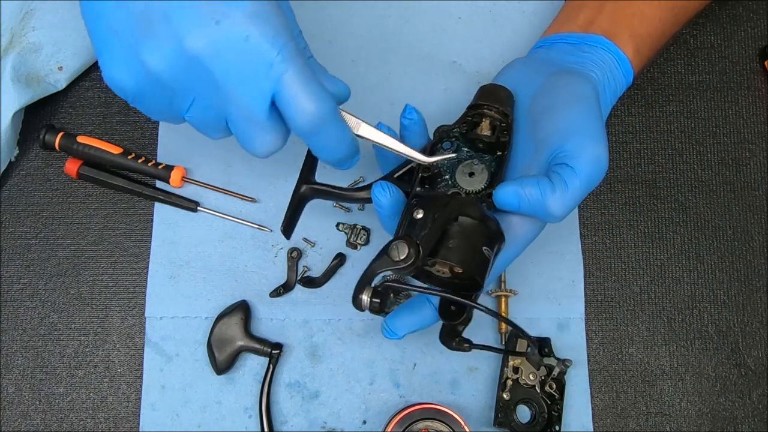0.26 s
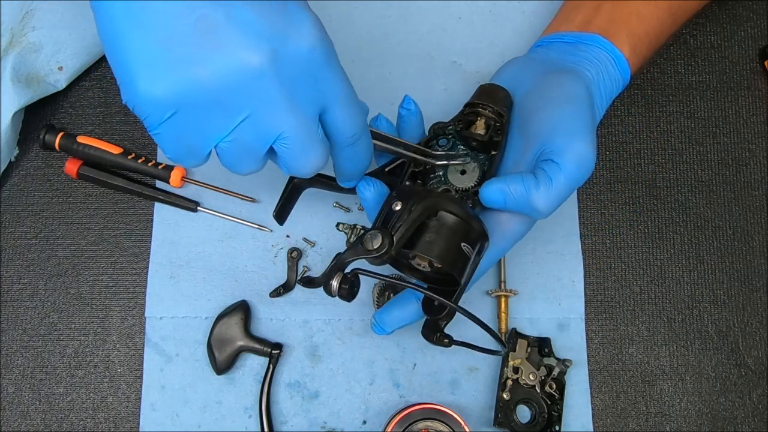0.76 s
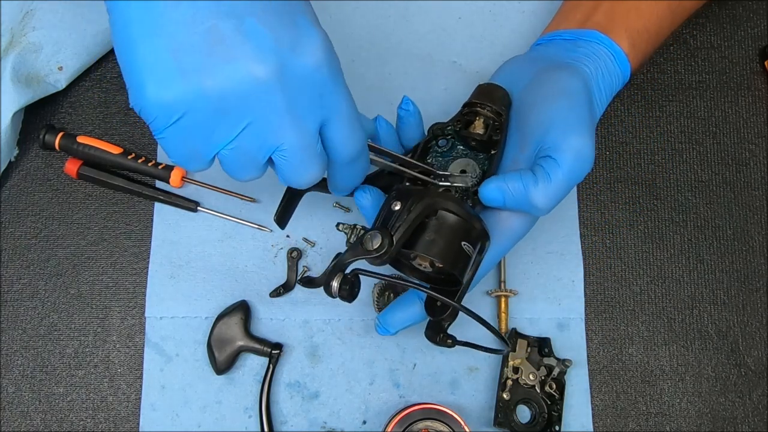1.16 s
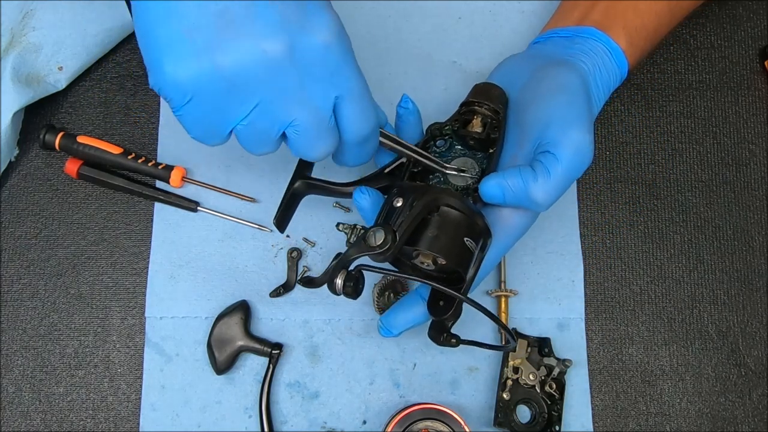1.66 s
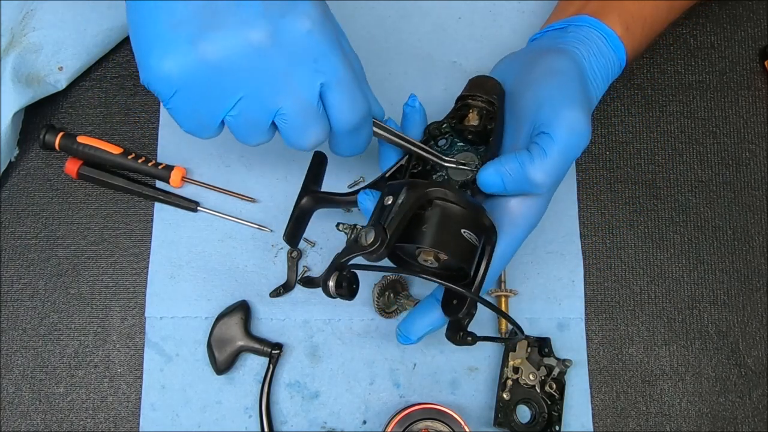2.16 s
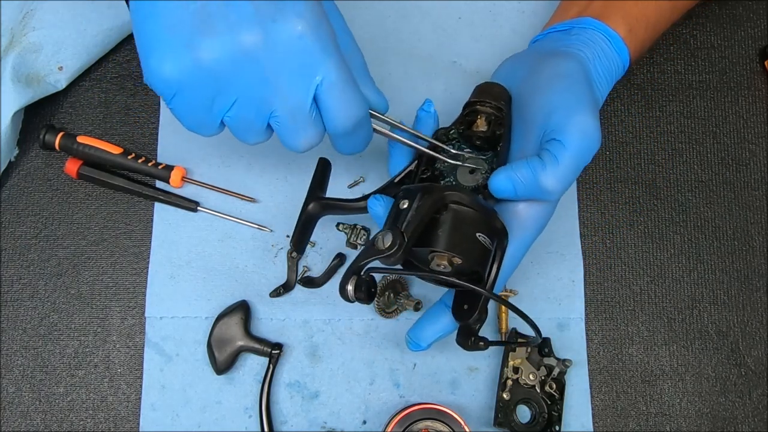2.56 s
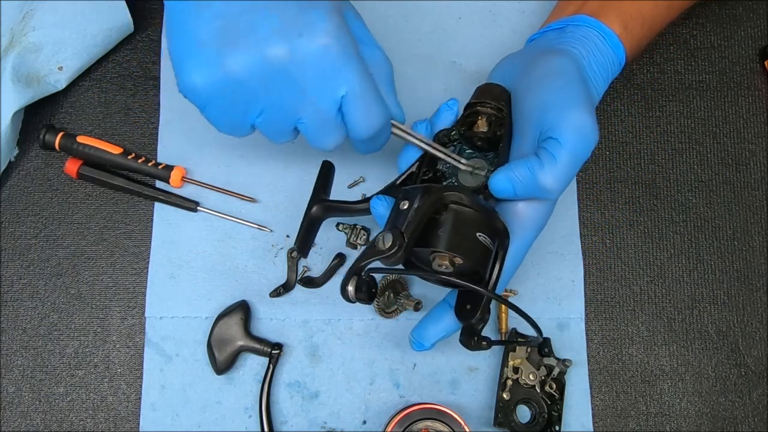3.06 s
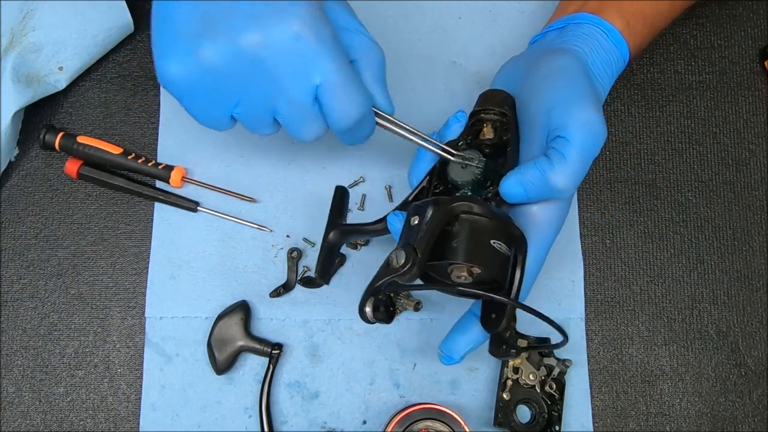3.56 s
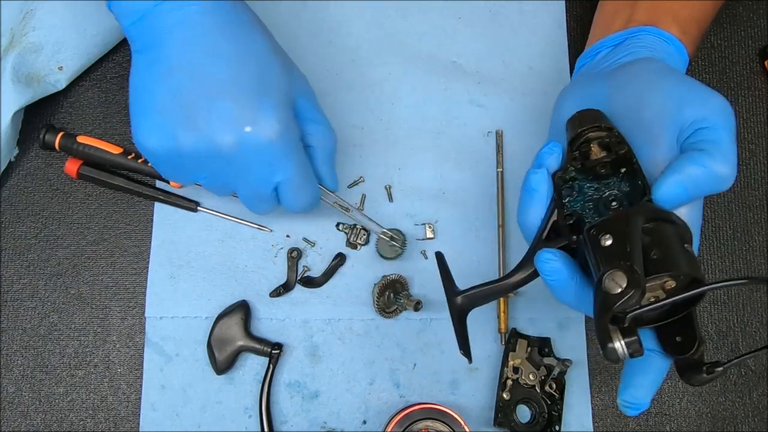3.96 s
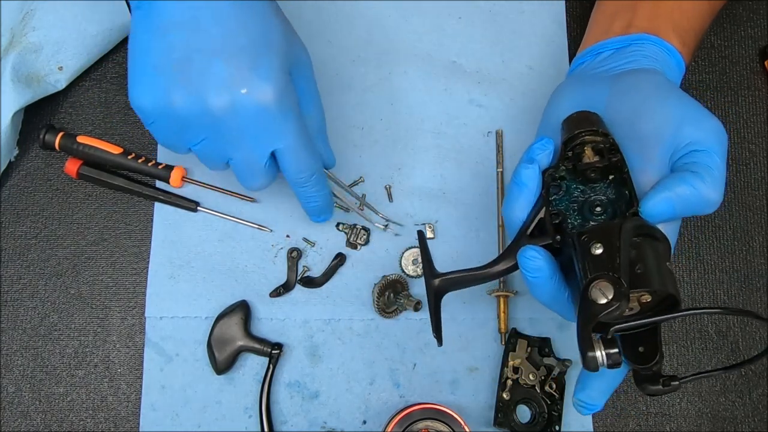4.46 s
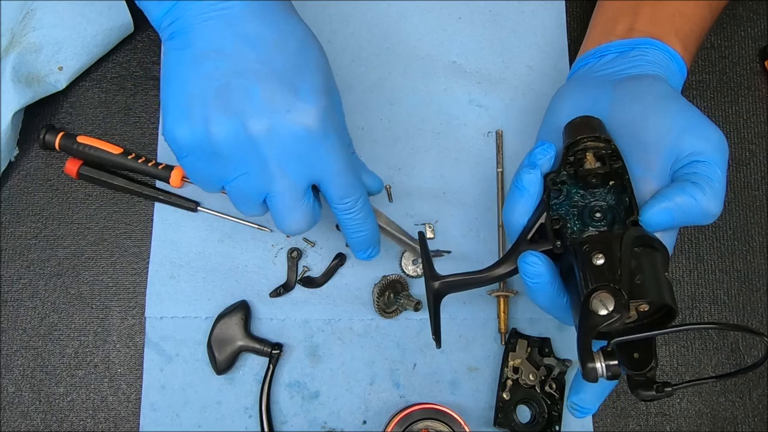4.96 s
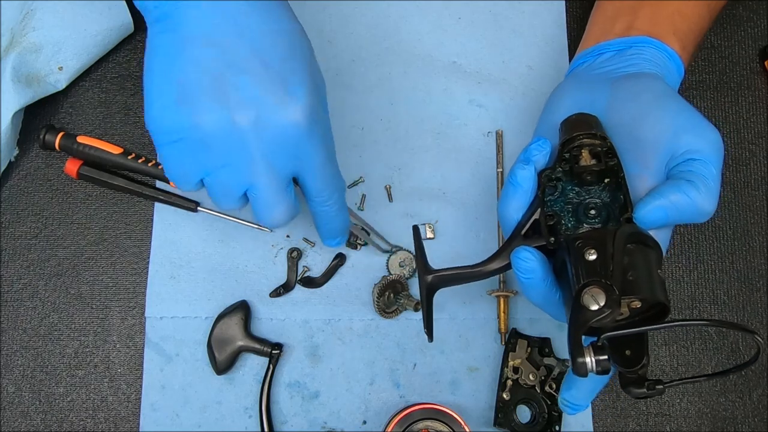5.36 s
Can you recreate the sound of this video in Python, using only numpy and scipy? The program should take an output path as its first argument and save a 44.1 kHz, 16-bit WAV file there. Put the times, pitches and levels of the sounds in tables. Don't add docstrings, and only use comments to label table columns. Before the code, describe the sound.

A low, unsteady ventilation rumble and a very faint transformer hum run throughout in a small quiet workshop. Barely audible glove brushes occur in the first half second. Steel tweezers tick on a fishing reel housing at about 0.7 s and a little more firmly at 0.9 s, with a sharp tiny crack near 1.85 s. At 2.3 s a short slide ends in the loudest bright metal click, with a rapid patter of small bounces. Dull and tinkling touches follow around 3.0 s, then a crisp gear tick at 3.43 s with a couple of bounces. At 4.2 s the gear and hand land on the padded bench with a soft, low, briefly ringing thud and a lighter knock. A quieter double thump settles at 5.3 s, with a last faint tap near 5.4 s. Metal rings are extremely short, with a slight room tail, heard from overhead with light hiss.

```python
import sys
import numpy as np
from scipy import signal
from scipy.fft import rfft, irfft
from scipy.io import wavfile
from scipy.ndimage import uniform_filter1d

SR = 44100
rng = np.random.default_rng(int(sys.argv[2]) if len(sys.argv) > 2 else 0)


def dump(signal):
    limited = np.clip(np.atleast_2d(signal).T, -1, 1)
    pcm = np.round(limited * 32767).astype(np.int16)
    wavfile.write(sys.argv[1], SR, pcm)


def gain_from_decibels(decibels):
    exponent = np.asarray(decibels, float) / 20
    return 10 ** exponent


N = 247356

# pitch_hz, level_db (per Hz)
AIR_SPECTRUM = [(4.7, -30), (8.0, 2.5), (25, -1.5), (69, -12.5), (89, -19), (122, -19), (179, -29),
                (279, -28.5), (337, -30.5), (448, -30.5), (744, -37), (845, -31), (1360, -40.5),
                (15600, -53.5)]
# pitch_hz, width_hz, boost_db
DUCT_RESONANCES = [(77, 4, 3.5), (106, 13, 3.5), (287, 10.6, 6.5), (359, 7.1, 4), (483, 13, 3.5)]
# pitch_hz, level_db, wobble_radians
HUM_TONES = [(118.9, -60, 0.016), (159, -67.5, 0.86)]
# loudest_s, level_db, centre_hz, width_octaves, fade_s
BRUSHES = [(.137, -63.5, 4000, 2.1, .017), (.166, -62.5, 5500, 2, 0.022), (.290, -64.5, 5800, 1.6, .03),
           (.461, -60.5, 4500, 1.7, 0.0068), (0.707, -54, 3300, 1.2, 0.0033),
           (0.901, -49.5, 3500, 1.2, 0.0035), (1.477, -58, 7900, 1.9, 0.0023),
           (1.680, -64.5, 3000, 4.2, .005), (1.847, -55, 3800, 1.3, 0.0032), (2.308, -50, 2920, 1, .006),
           (2.322, -53.5, 3600, 2, 0.018), (2.834, -60, 1500, 1, .004), (3.074, -64, 5000, 1.6, .004),
           (3.085, -64, 6000, 1.6, .0025), (3.433, -43, 3960, 0.65, 0.002),
           (3.451, -62.5, 4500, 3.5, 0.034), (3.452, -62, 9600, .13, 0.027), (4.149, -66.5, 6530, .7, .009),
           (4.150, -63.5, 2500, .6, .006), (4.240, -66, 7000, 1.5, .006), (4.582, -68, 5000, 1.3, .006),
           (5.035, -65.5, 5600, .89, .02), (5.275, -63, 2980, 2.9, .0055), (5.302, -61.5, 8900, .74, .0055)]
# catch_s, level_db, centre_hz, width_octaves
SLIDES = [
    (2.298, -55, 6000, 4.2),
    (3.429, -58, 6000, 2.2),
]
# pitch_hz, level_db, ring_share (of the full ring time)
HOUSING_MODES = [(1020, -14, .5), (1645, 0, .75), (1780, -2, .3), (2170, -9, .35), (2440, -1, .6),
                 (2690, -3, .45), (2825, 0, .7), (2890, -10, .9), (3135, -7, .9), (3330, -12, .6),
                 (4300, -11, .4), (4525, -9, 1), (5000, -8, .35), (5830, -9, .4), (6400, -11, .3),
                 (7400, -10, .3), (7700, -13, .4), (9200, -15, .4)]
TWEEZERS_MODES = [(1020, -12, .9), (1550, -15, .5), (2150, -9, .7), (2600, -12, .5), (3100, -13, .4),
                  (3890, -10, .7), (4170, -10, .5), (4800, -12, .4), (5430, -5, .8), (5700, -6, .6),
                  (6200, -10, .5), (6800, -7, .5), (7150, -5, .9), (7290, 0, .8), (7370, -12, .5),
                  (7450, -2, .7), (7640, -6, .7), (8020, -10, .6), (9680, -9, .7), (10400, -13, .6),
                  (11000, -14, .5), (12800, -17, .5)]
GEAR_MODES = [(1060, -4, .5), (1690, 0, 1), (2190, -5, .7), (2480, -2, 1), (3150, -10, .6), (3550, -8, .5),
              (4100, -5, .25), (4620, -9, .8), (4900, -5, .5), (5800, -8, .3), (6980, 0, .3),
              (7250, -6, .5), (9030, -6, .4), (9470, 2, .4), (9980, 0, .35), (10600, -6, .3),
              (12600, -9, .25), (14800, -7, .2)]
BENCH_MODES = [(114, -1, 1), (138, -16, .5), (165, 0, .6), (256, 0, .55), (288, -6, .9), (355, -10, .7),
               (450, -14, 1), (482, -11, .6), (560, -19, .5), (640, -19, .4), (850, -27, .3)]
# start_s, level_db, crack_db, hardness_db (per octave)
HOUSING_HITS = [
    (0.7073, -43, -47, -2),
    (.8984, -40.5, -44.5, -0.5),
    (1.8454, -53, -38, -0.5),
    (2.961, -50.5, -54, -10),
]
TWEEZERS_HITS = [
    (2.3018, -30.5, -54, 1.1),
    (2.3038, -40, -37, 2.3),
    (2.3050, -29.5, -38, -4.5),
    (2.3098, -41, -46, .3),
    (2.3150, -37, -42, -9),
    (2.3255, -47, -57, 1.5),
    (2.3712, -57, -70, 2.1),
]
GEAR_HITS = [
    (3.401, -52, -60, -4),
    (3.4300, -37, -33, -0.3),
    (3.4391, -42.5, -50, -7),
    (3.4425, -63, -58, 5),
    (3.4722, -49, -51, -9),
]
# start_s, level_db, pitch_hz, ring_s (time to fall 60 dB)
PINGS = [(1.750, -56, 3380, 0.017), (1.8505, -52, 7700, .011), (2.486, -54.5, 3500, 0.019),
         (2.959, -50.5, 10300, .035), (2.963, -51, 10250, .04), (2.959, -61, 13500, .015),
         (2.961, -52.5, 7030, .02), (2.961, -54, 6070, .02), (3.084, -56, 7200, 0.02),
         (3.084, -55, 8100, .015), (3.085, -58, 6150, .015), (3.186, -60, 6900, .02),
         (4.580, -58, 3570, 0.037)]
# start_s, level_db, hardness_db (per octave), ring_s
THUMPS = [
    (4.2024, -27.5, -.5, 0.34),
    (4.2393, -40, 10, 0.12),
    (4.258, -59, 15.5, 0.16),
    (5.271, -52.5, 5.5, 0.089),
    (5.297, -42, -3.5, 0.27),
    (5.314, -58.5, 11.5, 0.12),
    (5.323, -42.5, -17, .24),
    (5.396, -60, 11, 0.073),
]
# pitch_hz, level_db (per Hz)
HISS_SPECTRUM = [(88, -36), (150, -16), (274, -11), (1350, -11), (2230, -10), (13900, -10.5), (15600, -29)]


def coloured(count, gain):
    spectrum = rfft(rng.standard_normal(count))
    hz = np.fft.rfftfreq(count, 1 / SR) + 1
    noise = irfft(spectrum * gain(hz), count)
    return noise / np.std(noise)


def walk(rate_hz):
    return coloured(N, lambda hz: 1 / (1 + (hz / rate_hz) ** 4))


def read(table, hz):
    table_hz, table_db = np.array(table)[:, 0], np.array(table)[:, 1]
    return np.interp(np.log(hz), np.log(table_hz), table_db)


def workshop():
    air_db, rumble_db, gust_db = -44, -45, 2
    t = np.arange(N) / SR

    def colour(hz):
        duct_db = sum(db / (1 + (2 * (hz - f) / width) ** 2) for f, width, db in DUCT_RESONANCES)
        return gain_from_decibels(read(AIR_SPECTRUM, hz) + duct_db)

    spectrum = rfft(coloured(N, colour))
    hz = np.fft.rfftfreq(N, 1 / SR)
    deep = irfft(spectrum / (1 + (hz / 48) ** 6), N)
    air = gain_from_decibels(air_db) * (irfft(spectrum, N) - deep) * gain_from_decibels(0.34 * walk(10))
    power = uniform_filter1d(uniform_filter1d(deep ** 2, SR // 6), SR // 6)
    rumble = deep / np.sqrt(power) * gain_from_decibels(rumble_db + gust_db * walk(4.7))
    hum = np.zeros(N)
    for f, db, wobble in HUM_TONES:
        hum += gain_from_decibels(db) * np.sqrt(2) * np.sin(2 * np.pi * f * t + wobble * walk(3.9))
    return air + rumble + hum


def add(out, start_s, sound):
    i = int(start_s * SR)
    out[i:i + len(sound)] += sound[:N - i]


def brushes():
    out = np.zeros(N)
    t = np.arange(-SR // 20, SR // 8) / SR
    strokes = []
    for s, db, hz, octaves, fall in BRUSHES:
        rise = fall * (.4 + 21 * fall)
        strokes.append((s, db, hz, octaves, fall, rise))
    for s, db, hz, octaves in SLIDES:
        strokes.append((s, db, hz, octaves, .002, .008))
    for s, db, hz, octaves, fall, rise in strokes:
        rub = coloured(len(t), lambda f: np.exp(-2 * (np.log2(f / hz) / octaves) ** 2))
        grain_db = 3.9 * np.repeat(rng.standard_normal(len(t) // 64 + 1), 64)[:len(t)]
        swell = np.where(t < 0, np.exp(-(t / rise) ** 2), np.exp(-t / fall))
        add(out, s + t[0], gain_from_decibels(db) * rub * gain_from_decibels(grain_db) * swell)
    return out


def room(x):
    level_db, mid_t60_s, top_t60_s = -9.5, .27, .2
    t = np.arange(SR // 2) / SR
    mid = coloured(len(t), lambda hz: 1 / (1 + (hz / 8500) ** 4) / (1 + (2700 / hz) ** 2))
    top = coloured(len(t), lambda hz: 1 / (1 + (8500 / hz) ** 4))
    tail = mid * gain_from_decibels(-60 * t / mid_t60_s) + 1.2 * top * gain_from_decibels(-60 * t / top_t60_s)
    tail = tail * np.clip((t - .004) / .005, 0, 1)
    return gain_from_decibels(level_db) * signal.fftconvolve(x, tail / np.linalg.norm(tail))[:N]


def ring(modes, db, hard_db, t60_s, chance, load_cycles=.6):
    hz, mode_db, share = np.transpose(modes)[:, :, None]
    t = np.arange(SR // 4) / SR
    luck_db, luck_pitch = chance.reshape(2, -1, 1)
    gain = gain_from_decibels(db + mode_db + hard_db * np.log2(hz / hz[1]) + luck_db)
    fade = np.exp(-np.log(1000) * t / (t60_s * np.minimum(share, 1)))
    swing = (-1.) ** np.arange(len(hz))[:, None]
    load = np.minimum(t * hz / load_cycles, 1)
    tone = np.sin(2 * np.pi * hz * (1 + .003 * luck_pitch) * t)
    return np.sum(gain * fade * swing * load * tone, axis=0)


def metal():
    out = np.zeros(N)
    t = np.arange(SR // 40) / SR
    objects = ((HOUSING_MODES, HOUSING_HITS, .048),
               (TWEEZERS_MODES, TWEEZERS_HITS, .023),
               (GEAR_MODES, GEAR_HITS, .03))
    for modes, hits, t60_s in objects:
        for s, db, crack_db, hard_db in hits:
            add(out, s, ring(modes, db, hard_db, t60_s, rng.standard_normal(2 * len(modes))))
            top_hz = 10500 * gain_from_decibels(hard_db)
            crack = coloured(len(t), lambda hz: 1 / (1 + (hz / top_hz) ** 6) / (1 + (900 / hz) ** 4))
            add(out, s, gain_from_decibels(crack_db) * crack * np.exp(-t / .0012))
    for s, db, hz, t60_s in PINGS:
        small_part = [(hz, 0, 1), (1.9 * hz, -9, .6)]
        add(out, s, ring(small_part, db, 0, t60_s, np.zeros(4)))
    return out


def bench():
    out = np.zeros(N)
    for s, db, hard_db, t60_s in THUMPS:
        push_s = .0018 * gain_from_decibels(-0.15 * hard_db)
        force = np.hanning(int(push_s * SR) + 3)
        chance = rng.standard_normal(2 * len(BENCH_MODES))
        top = ring(BENCH_MODES, db, hard_db, t60_s, chance, load_cycles=0.32)
        add(out, s, np.convolve(top, force / force.sum()))
    return out


def scene():
    near = metal() + brushes()
    return np.tile(near + room(near) + bench() + workshop(), (2, 1))


def roll_off(x):
    return signal.sosfilt(signal.butter(12, 16670, fs=SR, output="sos"), x)


def record(dry):
    hiss = gain_from_decibels(-80.5) * coloured(N, lambda hz: gain_from_decibels(read(HISS_SPECTRUM, hz)))
    cut = signal.ellip(10, .2, 40, 15750, fs=SR, output="sos")
    mix = signal.sosfilt(cut, dry + hiss * np.array([[1], [-1]]))
    return roll_off(mix)


dry = scene()
out = record(dry)
dump(out)
```